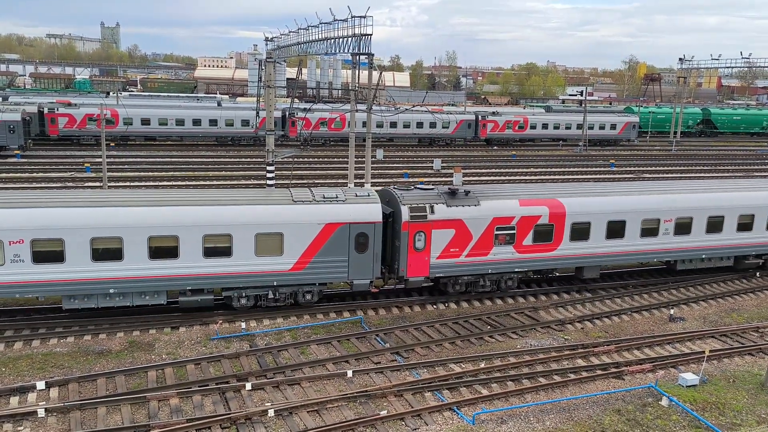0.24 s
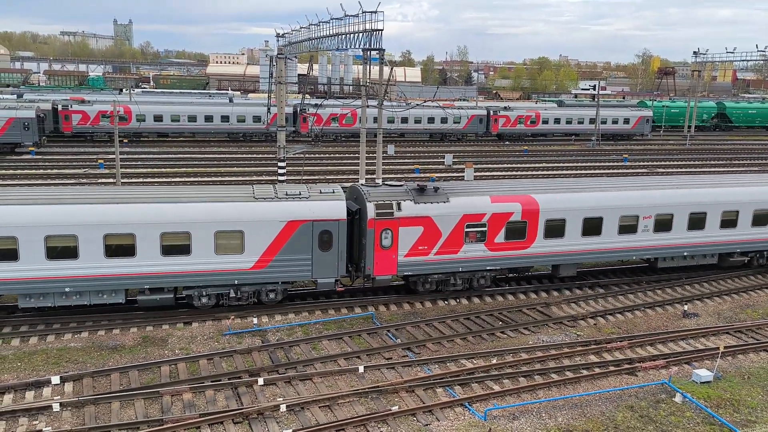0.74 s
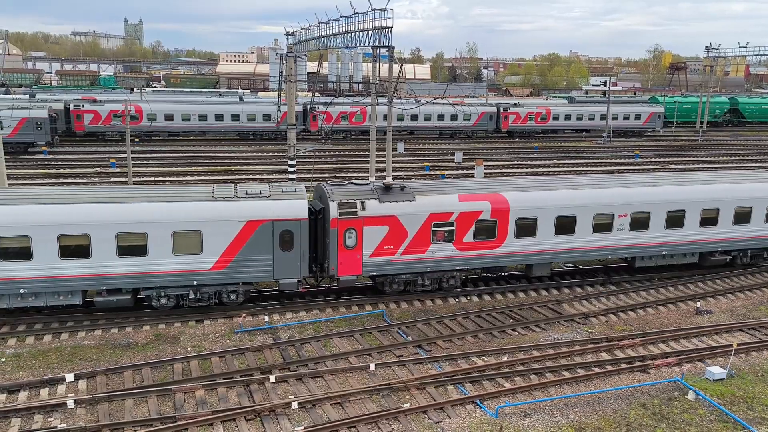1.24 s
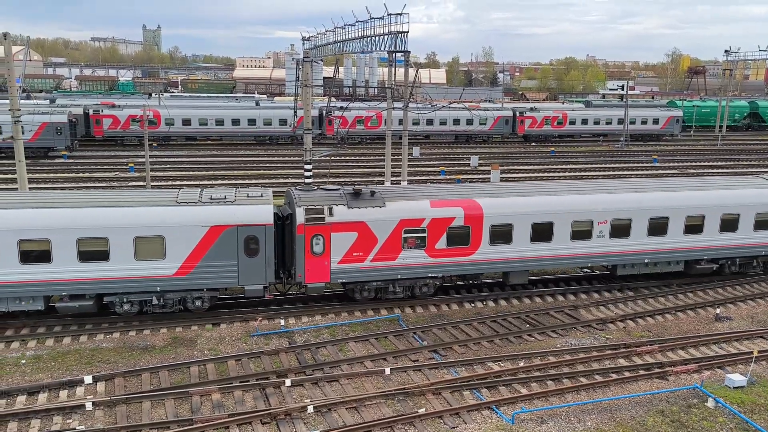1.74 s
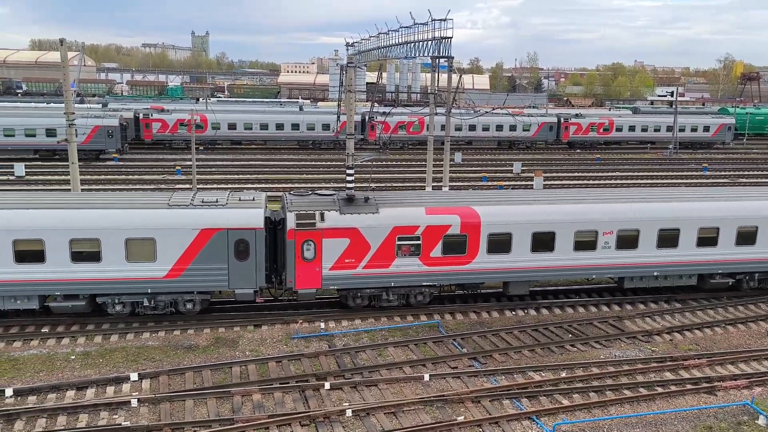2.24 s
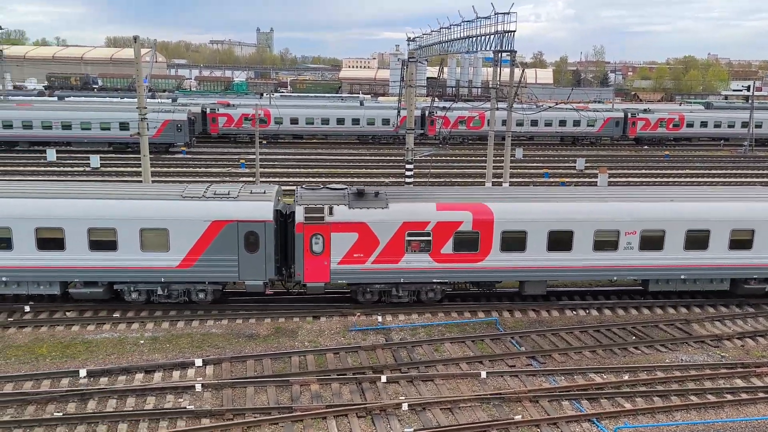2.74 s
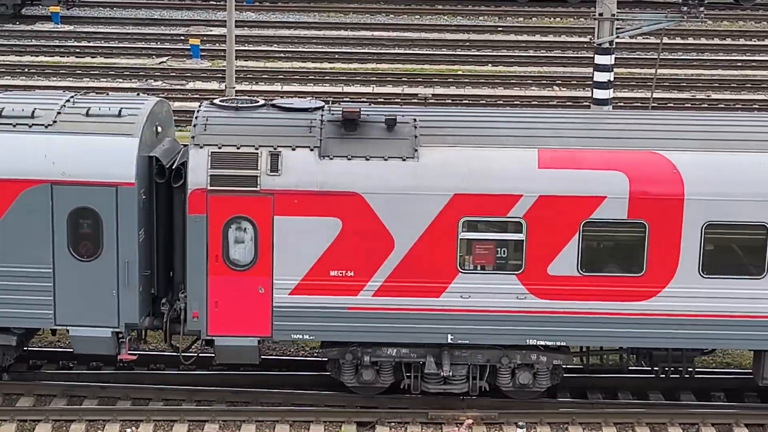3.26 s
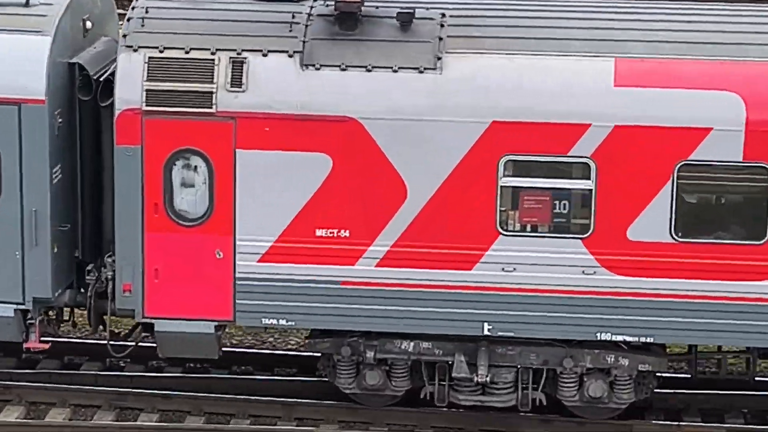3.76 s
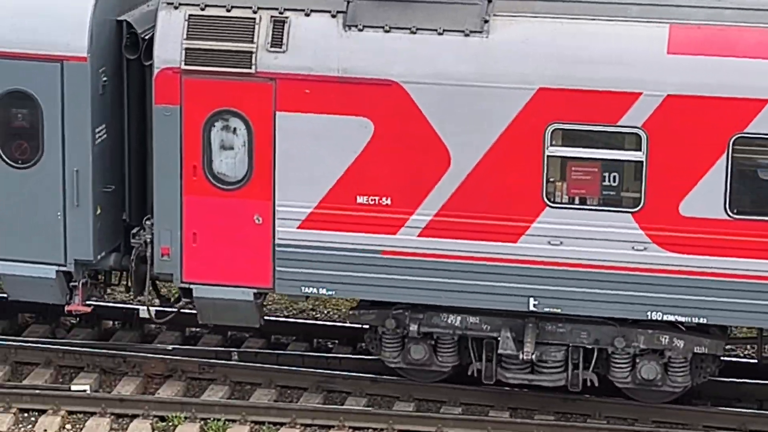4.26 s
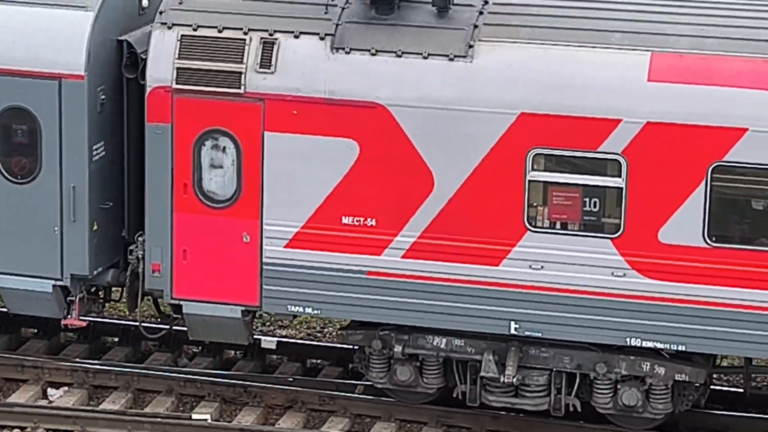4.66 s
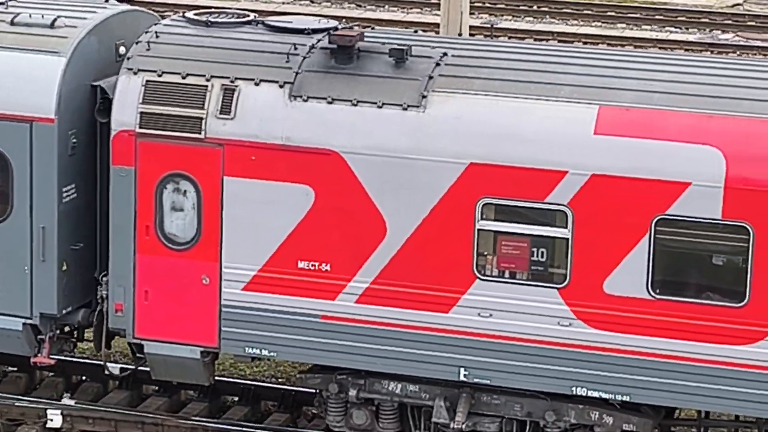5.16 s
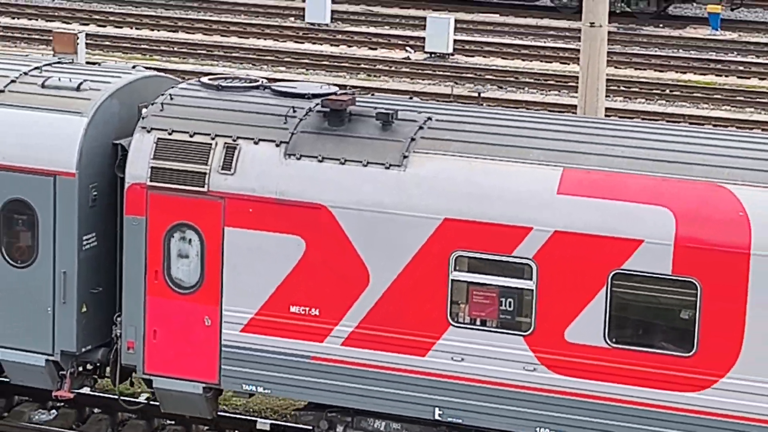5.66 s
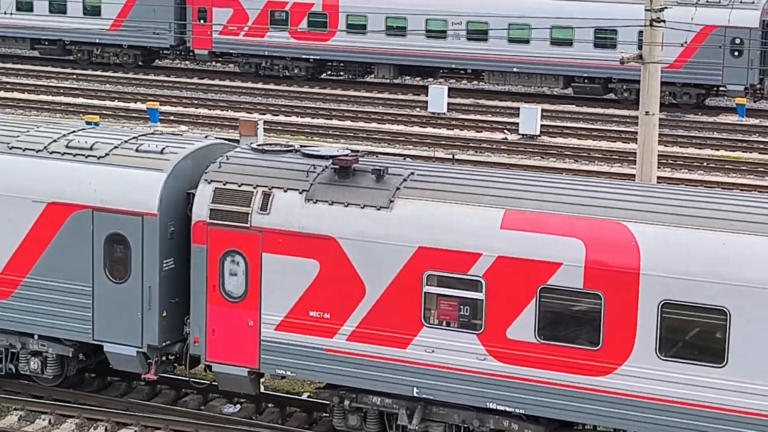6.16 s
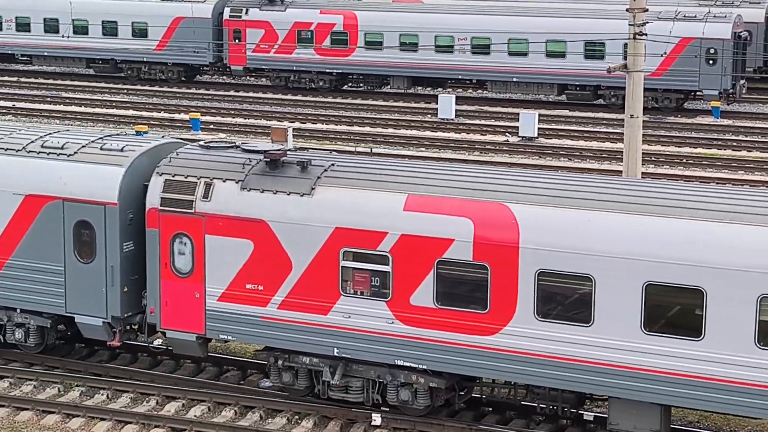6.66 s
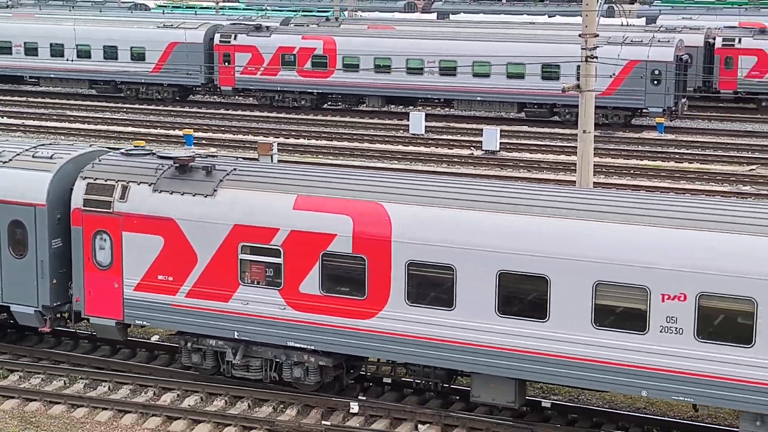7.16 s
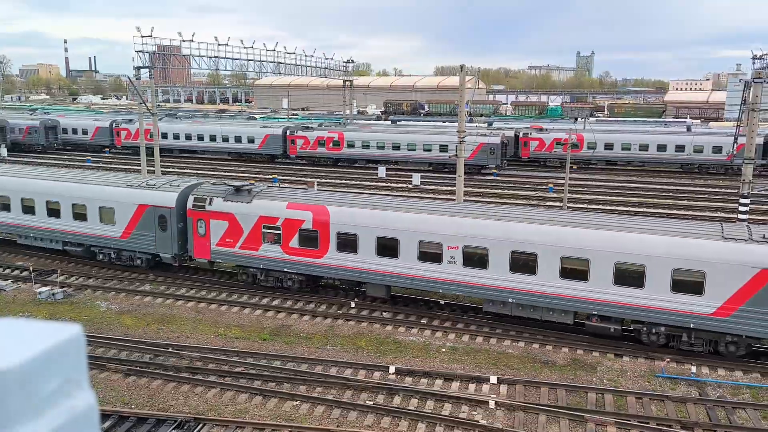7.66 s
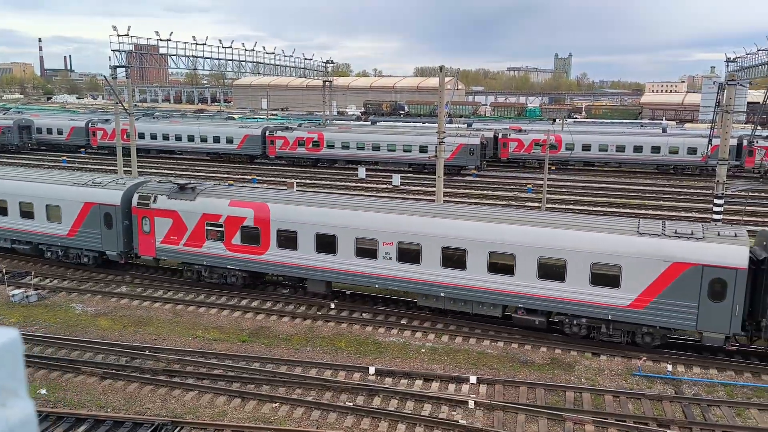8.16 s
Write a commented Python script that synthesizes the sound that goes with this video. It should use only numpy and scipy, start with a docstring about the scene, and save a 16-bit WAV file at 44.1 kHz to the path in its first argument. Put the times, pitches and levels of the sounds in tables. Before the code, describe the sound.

Passenger coaches roll slowly through a rail-yard curve, heard from above, with a low rumble throughout. From the start, the wheels grind in repeated bouts of high, ringing metallic hiss, with a piercing squeak near 0.4 seconds and a sharp scrape at 1.5. Wheels knock and thud irregularly over rail joints for the first three seconds. The grinding thins to a softer hiss around 2.3 seconds, then returns almost unbroken from 2.9 to 5.7, with thin squeals standing out near 3.7 and 5.3. A short, loud metallic screech hits at 6 seconds. From about 6.4, fainter ringing and grinding come from farther wheels, toward the right, while joint knocks, back since 5.7, continue to the end at about 8.4. Wind buffets the microphone all along with low gusts and occasional pops, strongest on the left between 2.5 and 4.5 seconds.

```python
"""Wheel flanges grind and squeal in bouts as passenger coaches roll slowly through a rail-yard curve.
Stick-slip friction hisses and rings the wheel modes; now and then one locks into a squeal.
Near the end a farther bogie takes over. Wheels knock over joints above a low rolling rumble.
Heard from above on a windy day: gusts buffet the two microphone ports in turn."""
import sys
import numpy as np
from scipy import signal
from scipy.fft import rfft, irfft, next_fast_len
from scipy.io import wavfile
from scipy.ndimage import uniform_filter1d, map_coordinates

SR = 44100
rng = np.random.default_rng(int(sys.argv[2]) if len(sys.argv) > 2 else 0)


def waveform_to_disk(signal):
    """Save audio, clipped to [-1, 1], as 16-bit WAV at the path in sys.argv[1]."""
    frames = np.transpose(np.atleast_2d(signal))
    scaled = np.clip(frames, -1, 1) * 32767
    samples = np.round(scaled).astype(np.int16)
    wavfile.write(sys.argv[1], SR, samples)


N = 370881
T = np.arange(N) / SR
HZ = np.fft.rfftfreq(N, 1 / SR)
TOP_EDGE_HZ, RASP_EDGE_HZ = (8300, 10000), (4900, 6200)  # top band fades in, low rasp band fades out

# friction hiss spectrum: (frequency [Hz], level [dB])
FRICTION_HISS = [(800, -24), (1800, -16), (2900, -9), (3800, -12), (4400, -1), (5500, 0), (6400, 4.5),
                 (7100, 3.5), (8200, 1), (8800, -13.5), (10500, -13.5), (12500, -12.5), (15000, -17),
                 (16000, -37)]


def flanges():
    """Stick-slip friction hisses at the contact and keeps the wheel modes ringing."""
    # near coach wheel modes: (frequency [Hz], width [Hz], level [dB])
    near_modes = [(3386, 24, -15), (3758, 23, -18), (4210, 32, -16), (4430, 41, -15), (5071, 28, -11),
                  (5227, 26, -10), (6013, 15, -5), (6298, 28, -6), (6939, 26, -3), (7017, 28, 0),
                  (7265, 47, -9), (7887, 17, -8), (8067, 13, -7), (8239, 21, -15), (8821, 13, -25),
                  (9103, 30, -21), (9827, 30, -19), (10193, 21, -17), (10802, 40, -21), (11526, 21, -19),
                  (11822, 47, -20), (12064, 24, -17), (12481, 17, -12), (12799, 23, -15), (13388, 17, -16),
                  (13916, 32, -20), (14462, 17, -12), (15025, 34, -19), (15754, 19, -21)]
    # farther bogie wheel modes: (frequency [Hz], width [Hz], level [dB])
    far_modes = [(5160, 37, -2), (6120, 30, 0), (6710, 34, -4), (6890, 39, -2), (7100, 29, -4),
                 (7670, 33, -7), (7890, 34, -7), (8140, 34, -11), (11400, 45, -16), (13700, 83, -16),
                 (14200, 47, -11), (14700, 44, -12), (15000, 29, -12), (15300, 120, -12)]
    handover_s = 6.33
    # countless weak modes ripple the hiss spectrum
    ripple_db = np.interp(HZ, [3000, 7000, 10000], [1.2, 2, 3.2]) * wander(70)[:len(HZ)]
    hiss = noise(amp(at_hz(FRICTION_HISS, HZ) + ripple_db), coherence=0.3)
    near = doppler(noise(wheel_gain(near_modes, sharpness=1.02), coherence=0.42))
    far = noise(wheel_gain(far_modes, sharpness=1.5), coherence=0.27)
    far_share = np.clip((T - handover_s) * 10, 0, 1)
    wheel = near * np.sqrt(1 - far_share) + far * np.sqrt(far_share)
    level_db, ring_db, top_db, rasp_db, side_db = grinding_bouts()
    chatter = amp(0.34 * wander(11) + wander(200))
    rub = (hiss * chatter + glints() + wheel * amp(ring_db)) / np.sqrt(1 + amp(ring_db) ** 2)
    grind = contact_shift(rub, top_db, rasp_db, patchy_db=2.5, flicker_db=0.9)
    grind *= amp(level_db + 0.5 * wander(17))  # unsteady flange pressure
    return (grind + bites(rub, near)) * pan(side_db)


def grinding_bouts():
    """Level, ring, top, rasp and left-right curves in dB; the strongest bout dominates the colour."""
    # flange contact: (start [s], end [s], rise [s], level [dB], ring against hiss [dB],
    # top [dB], rasp [dB], left-right [dB])
    bouts = [(-.03, 0.55, 0.053, -21.5, 3, 4, 1.5, 2), (0.546, 0.93, 0.046, -18.5, 2.5, 6.5, -1.5, 5),
             (0.91, 1.46, 0.021, -16, 0.5, 4.5, 2.5, 1.5), (1.567, 2.22, 0.021, -16.5, 2, 3, 1, 3),
             (2.226, 2.72, 0.027, -25, -18, 9, -0.5, 2.5), (2.915, 3.238, 0.029, -18, -3, 9.5, 1, -1),
             (3.244, 3.45, 0.01, -17.5, 5, 7.5, 4, 0), (3.448, 3.89, 0.052, -16.5, -3, 8, 1.5, -1.5),
             (3.89, 4.393, 0.032, -17.5, -3.5, 6, 2.5, -0.5), (4.375, 5.23, 0.04, -15.5, -4, 5, 0, -1.5),
             (5.28, 5.68, 0.02, -16, -0.5, 4, -1.5, 2), (6.417, 6.952, 0.15, -31.5, 2, 8.5, 3.5, -6.5),
             (6.96, 7.54, 0.052, -33, 2, 6, 2.5, -4), (7.79, 8.247, 0.033, -32.5, -8, 5, -4.5, -14)]
    # rubbing between bouts: (level [dB], ring against hiss [dB], top [dB], rasp [dB])
    light_rub = (-40.5, -9, 6.5, 1)
    release_s, ring_on_db_per_s = 0.089, 26
    power = np.full(N, amp(light_rub[0]) ** 2)
    rub_side_db = -30 * np.clip((T - 7.62) * 20, 0, 1)  # light rubbing moves to the right port
    colour = np.array([db * power for db in (*light_rub[1:], rub_side_db)])
    for start, end, rise, db, ring_db, *tone_db in bouts:
        bout_power = (amp(db) * swell(start, end, rise, release_s)) ** 2
        ring_on_db = ring_on_db_per_s * np.maximum(T - end, 0)  # modes outlast the hiss
        power += bout_power
        colour += np.array([value * bout_power for value in (ring_db + ring_on_db, *tone_db)])
    return 10 * np.log10(power), *(colour / power)


def wheel_gain(modes, sharpness):
    """Narrow wheel resonances, with the lowest and highest ones softer."""
    # trim on the mode levels: (frequency [Hz], gain [dB])
    mode_tilt = [(3400, -4), (3750, -5), (4200, 0), (8000, 0), (12000, -2), (15000, -6)]
    power = sum(amp(db) ** 2 / (1 + ((HZ - hz) * sharpness / width) ** 2) ** 2
                for hz, width, db in modes)
    return np.sqrt(power) * amp(at_hz(mode_tilt, HZ))


def doppler(x):
    """Pitch sinks slightly as the coach passes."""
    # Doppler shift: (time [s], pitch [ratio])
    shift = [(0, 1.0003), (1.6, .9987), (3.6, .9952), (5, .9925), (8.41, .992)]
    position = np.cumsum(curves(shift)[0])
    return np.array([map_coordinates(port, [position], order=5, mode="wrap") for port in x])


def contact_shift(x, top_db, rasp_db, patchy_db, flicker_db):
    """The contact patch moves over the flange: colour changes, modes trade strength."""
    hz, t, spectra = signal.stft(x, SR, nperseg=1024, noverlap=768)
    patches, flicker = rng.standard_normal((2, len(hz), len(t)))
    patches = unit(uniform_filter1d(uniform_filter1d(patches, 9, 0), 50, 1))
    flicker = unit(uniform_filter1d(uniform_filter1d(flicker, 30, 0), 6, 1))
    top = np.interp(hz, TOP_EDGE_HZ, [0, 1])[:, None] * np.interp(t, T, top_db)
    rasp = np.interp(hz, RASP_EDGE_HZ, [1, 0])[:, None] * np.interp(t, T, rasp_db)
    spectra *= amp(patchy_db * patches + flicker_db * flicker + top + rasp)
    return signal.istft(spectra, SR, nperseg=1024, noverlap=768)[1][:, :N]


def glints():
    """Minor modes catch briefly: faint tones at random pitches, weighted by the hiss spectrum."""
    count, low_hz, high_hz, decay_s = 400, 2967, 8530, 0.041
    out = np.zeros((2, N + SR))
    t = T[:SR // 3]
    envelope = t / decay_s * np.exp(1 - t / decay_s) * (1 - t / t[-1])
    for when, pitch, size, *phase in rng.random((count, 5)):
        hz = low_hz + pitch * (high_hz - low_hz)
        tone = np.sin(2 * np.pi * (hz * t + np.array(phase)[:, None]))
        out[:, int(when * N):][:, :len(t)] += 2 * size * amp(at_hz(FRICTION_HISS, hz)) * envelope * tone
    return amp(-11) * out[:, :N]


def bites(rub, wheel):
    """The flange catches: a friction burst, then the wheel rings and the yard echoes."""
    # flange bites and a strike at a switch: (time [s], level [dB], rise [s], decay [s], top [dB])
    catches = [(.225, -16, .004, 0.018, -5), (.26, -18, .003, 0.015, -12), (.375, -31, .005, 0.011, -11),
               (0.418, -20, 0.0025, 0.0079, -14), (1.49, -14, .003, 0.027, 5),
               (2.039, -27, .005, 0.027, -6), (2.135, -27, .005, .04, -1), (2.635, -43, .002, 0.0088, -2),
               (2.758, -22, 0.01, 0.1, 14.5), (2.86, -15.5, 0.01, 0.03, 5), (5.755, -14, 0.0025, 0.01, -6),
               (6.004, -2.5, 0.011, 0.016, -2), (6.07, -30, .005, 0.042, 8)]
    spectrum = rfft(rub)
    top = irfft(spectrum * np.interp(HZ, TOP_EDGE_HZ, [0, 1]), N)
    rasp = irfft(spectrum * np.interp(HZ, RASP_EDGE_HZ, [1, 0]), N)
    body = rub - top - rasp + amp(-8) * rasp
    burst, bright, ring = np.zeros((3, N))
    for s, db, rise, decay, top_db in catches:
        envelope = amp(db) * blow(s, rise, decay)
        burst += envelope
        bright += amp(top_db) * envelope
        ring += amp(db - 20) * blow(s, rise_s=0.01, decay_s=0.067)
    out = burst * body + bright * top + ring * wheel
    return out + amp(-12) * yard_echo(out, t60_s=0.51)


def squeals():
    """Single self-excited wheel modes swell and fade, fluttering over changing paths."""
    # locked modes: (peak time [s], rise [s], fall [s], frequency [Hz], level [dB])
    tones = [(.33, .25, .25, 7025, -24), (.385, .015, .02, 7025, -14), (.427, .006, .014, 7025, -10.5),
             (.65, .3, .2, 6011, -30), (.65, .3, .25, 7860, -32), (.3, .2, .4, 5230, -33),
             (1.85, .5, .3, 5064, -32), (1.5, .6, .6, 6295, -30), (2.26, .12, .1, 3005, -36),
             (3.66, .1, .2, 4943, -22), (3.68, .12, .15, 5052, -28), (3.7, .17, .28, 3191, -29.5),
             (4.17, .13, .22, 3186, -28.5), (4.7, .25, .3, 5975, -28), (5.25, .2, .13, 5970, -18),
             (5.66, .09, .15, 5968, -27), (5.1, .3, .35, 4395, -35), (5.1, .5, .4, 3380, -37),
             (5.6, .2, .17, 14352, -26), (1.25, .2, .25, 13380, -30), (3.3, .2, .15, 7011, -23),
             (5.65, .1, .25, 9130, -38), (5.7, .2, .3, 5028, -38), (6.04, .02, .1, 6977, -25),
             (6.75, .22, .3, 5162, -39), (7.38, .15, .12, 5160, -44), (6.95, .35, .4, 6123, -38),
             (7.58, .03, .025, 4420, -39)]
    out = np.zeros((2, N))
    flutter = amp(2 * np.array([wander(20), wander(27)]) + 3.1 * wander(45))
    path_rad = 1.1 * np.array([wander(2.2), wander(16)])
    drift = 0.000534 * wander(12.9) + 0.0018 * wander(284)  # uneven slip roughens the tone
    for s, rise, fall, hz, db in tones:
        span = slice(max(round((s - 4 * rise) * SR), 0), round((s + 4 * fall) * SR))
        t = T[span]
        envelope = amp(db) / np.cosh((t - s) / np.where(t < s, rise, fall) * 1.26)
        cycles = hz * np.cumsum(1 + drift[span]) / SR
        out[:, span] += envelope * np.sin(2 * np.pi * cycles + path_rad[:, span])
    return amp(1) * out * flutter


def joints():
    """Each wheel drop clanks on the rail end and thuds through the bogie frame."""
    # wheel drops: (time [s], level [dB], thud offset [dB])
    drops = [(0.106, -50.5, 20), (.4, -39.5, 6), (0.568, -41.5, 9), (0.649, -36.5, 11.5), (0.825, -32, 3),
             (0.989, -39, 4), (1.158, -42, 14), (1.238, -42, 10), (1.463, -34, 10.5), (1.645, -44, 12),
             (1.845, -38.5, 11), (2.658, -37, 7), (2.89, -38.5, 14), (3.595, -36, -7), (5.683, -34, 10),
             (5.895, -40.5, 2), (6.103, -39, 6.5), (6.272, -51, 26), (6.308, -45, 0), (6.348, -37, -2),
             (6.501, -40.5, 5), (6.743, -34.5, -4), (6.988, -53, 20), (7.122, -44.5, 13), (7.624, -34.5, 3),
             (7.727, -40.5, -8), (7.851, -44, 9), (8.283, -35, 4)]
    # broad clank spectrum: (frequency [Hz], level [dB])
    clank_spectrum = [(200, -42), (500, 20.5), (800, 12), (1250, 5), (1750, 9.5), (2600, 7.5), (5000, -8),
                      (12000, -39)]
    # steel resonances in the clank: (frequency [Hz], half-width [Hz], level [dB])
    steel_modes = [(990, 48, -2), (1295, 150, 4.5)]
    # bogie frame and rail modes: (frequency [Hz], level [dB], t60 [s])
    bogie_modes = [(126, 0, 0.15), (231, -6.5, 0.55), (316, 5.5, 0.18), (375.3, 7.5, 0.21),
                   (411, -19, 0.36), (577, -6, 0.11)]
    resonance = 1 + sum(amp(db) / (1 + ((HZ - hz) / width) ** 2) for hz, width, db in steel_modes)
    clank = sum(amp(db) * blow(s, rise_s=0.0037, decay_s=0.024) for s, db, _ in drops)
    clank = clank * noise(amp(at_hz(clank_spectrum, HZ)) * resonance, coherence=0.6)
    t = T[:SR // 3]
    attack = 1 - np.exp(-t / 0.0017)
    thud = np.zeros(N + len(t))
    for s, db, thud_db in drops:
        detune = 1 + 0.046 * rng.standard_normal(len(bogie_modes))
        ring = sum(amp(mode_db - 60 * t / t60) * np.sin(2 * np.pi * (hz * ratio * t + rng.random()))
                   for (hz, mode_db, t60), ratio in zip(bogie_modes, detune))
        thud[round(s * SR):][:len(t)] += amp(db + thud_db) * ring * attack
    knocks = amp(11) * clank + amp(-0.5) * thud[:N]
    return knocks + amp(-8.5) * yard_echo(knocks, t60_s=0.21)


def rolling():
    """Rough treads on rail: lumpy rumble from the whole train, roar from the nearest wheels."""
    # rumble spectrum: (frequency [Hz], level [dB])
    rumble_spectrum = [(25, -52), (50, -24), (80, 0.5), (130, -3.5), (220, -4), (400, 1), (560, -12.5),
                       (900, -27.5), (2000, -37)]
    # roar spectrum: (frequency [Hz], level [dB])
    roar_spectrum = [(250, -33), (450, 2), (700, 9), (1150, 6.5), (1650, 0), (2300, 4), (4000, -2),
                     (8000, -16), (16000, -19)]
    # course of the roar: (time [s], level [dB], left-right [dB])
    roar_course = [(0.0, -38.5, 3.5), (0.68, -39.5, 3), (1.17, -35, 0), (1.45, -41, 0.5), (2.74, -41, 0.5),
                   (3.02, -38, -3.5), (3.49, -37, 3), (3.58, -35.5, -5.5), (3.82, -37, 3),
                   (4.17, -38.5, -5), (4.22, -32, 5), (4.4, -43, -6), (5.5, -42, -4.5), (6.16, -45.5, -1),
                   (7.03, -39, 3), (7.24, -40, 3), (8.34, -42, -10), (8.41, -35, -4)]
    level_db, side_db = curves(roar_course)
    rumble = noise(amp(at_hz(rumble_spectrum, HZ)), coherence=0.91) * amp(-33 + 2.34 * wander(28))
    roar_gain = amp(level_db + 1.5 + 2.36 * wander(11.4))
    roar = noise(amp(at_hz(roar_spectrum, HZ)) * HZ / (HZ + 200), coherence=0.13)
    return rumble + roar_gain * roar * pan(side_db)


def wind():
    """Eddies buffet each port separately: gusts and pops on a lumpy breeze; fast eddies sound higher."""
    # breeze: (time [s], level [dB], left-right [dB])
    breeze = [(0, -30, -9), (1.3, -35.5, -16), (2.2, -37.5, -10), (2.7, -29, 8), (3.75, -22.5, 5),
              (4.5, -38, 14), (5.2, -35.5, 10), (5.8, -30, 0.5), (7.2, -27.5, 1), (8.1, -38.5, -13),
              (8.41, -27.5, -7)]
    # gusts: (start [s], length [s], level [dB], left-right [dB], fast-eddy share [0-1])
    gusts = [(0.295, 0.048, -23, -8, 0.36), (1.216, 0.047, -21, -8, 0.1), (1.845, 0.032, -21.5, -2, 1),
             (2.43, 0.14, -25, 14, 0.2), (2.596, 0.074, -19.5, 18, 0.3), (2.763, 0.044, -13.5, 22, 0),
             (2.875, 0.042, -15.5, 20, .4), (3.086, 0.042, -19, 16, 0.8), (3.271, 0.28, -17.5, 18, 1),
             (3.904, 0.2, -18.5, 30, 0.68), (4.159, 0.24, -16.5, 20, 0.85), (4.653, 0.24, -24, 14, 0.04),
             (4.997, 0.1, -21.5, 12, 0.3), (5.335, 0.13, -22, -10, 0.11), (5.704, 0.086, -24, -9, 0.02),
             (5.82, 0.23, -25.5, -22, 0), (6.23, 0.13, -27, 13, 0.1), (6.597, 0.11, -26, -18, 0),
             (6.87, 0.26, -24, 9, 0), (7.27, 0.13, -30, -14, 0), (7.558, 0.052, -22, -10, 0.07),
             (7.673, 0.075, -34, -10, .05)]
    # deep pops: (time [s], level [dB], frequency [Hz], half-length [s], left-right [dB])
    pops = [(0.471, -13, 116, 0.0084, -29), (2.92, -18, 92, 0.0071, 30), (6.035, -9.5, 96.5, 0.0081, -20),
            (7.62, -22, 133, 0.011, -17)]
    # buffeting spectrum: (frequency [Hz], level [dB])
    spectrum = [(25, -80), (50, -48), (80, -1.5), (130, 3.5), (260, 1), (400, -9), (600, -24.5),
                (1000, -37.5), (2000, -47), (5000, -54)]
    level_db, side_db = curves(breeze)
    lumps_db = 2.5 * np.array([wander(20.6), wander(20.6)])
    power = (amp(level_db + lumps_db) * pan(side_db)) ** 2
    fast_power = 0.11 * power
    for s, length, db, side, share in gusts:
        gust_power = (amp(db) * pan(side) * swell(s, s + length, rise_s=0.013, fall_s=0.022)) ** 2
        power += gust_power
        fast_power += share * gust_power
    eddies = amp(2.57 * np.array([wander(28), wander(31)]))
    slow = noise(amp(at_hz(spectrum, HZ)), coherence=0)
    fast = noise(amp(at_hz(spectrum, HZ / 1.51)) * HZ ** 2 / (HZ ** 2 + 220 ** 2), coherence=0)
    out = eddies * (np.sqrt(abs(power - fast_power)) * slow + np.sqrt(fast_power) * fast)
    for s, db, hz, half_s, side in pops:
        out += amp(db) * pan(side) * np.sin(2 * np.pi * hz * (T - s)) * np.exp(-((T - s) / half_s) ** 2)
    return out


def yard_echo(x, t60_s):
    """Scattered echoes from coaches and track."""
    t = T[:SR]
    taps = rng.standard_normal((2, SR)) * (rng.random((2, SR)) < 0.05)
    taps *= amp(-60 * t / t60_s) * (t > 0.012)
    return signal.fftconvolve(x, taps / np.linalg.norm(taps[0]), axes=1)[:, :N]


def amp(db):
    """Decibels to gain."""
    return 10 ** (np.asarray(db) / 20)


def unit(x):
    """Scale to rms 1."""
    return x / np.sqrt(np.mean(x ** 2) + 1e-20)


def at_hz(spectrum, hz):
    """Interpolate a spectrum over log frequency."""
    points_hz, db = np.transpose(spectrum)
    return np.interp(np.log(hz + 1), np.log(points_hz), db)


def curves(rows):
    """Columns of a timed table, per sample."""
    s, *columns = np.transpose(rows)
    return [np.interp(T, s, column) for column in columns]


def pan(db):
    """Constant-power gains; positive is left."""
    return np.sqrt(2 / (1 + amp(np.array([-db, db]).reshape(2, -1)) ** 2))


def wander(rate_hz):
    """Smooth random motion of rms 1, up to about rate_hz."""
    size = next_fast_len(N, real=True)
    hz = np.fft.rfftfreq(size, 1 / SR)
    return unit(irfft(rfft(rng.standard_normal(size)) / (1 + (hz / rate_hz) ** 4), size)[:N])


def noise(gain, coherence):
    """Coloured noise at both ports; the shared part reaches the left first."""
    lag_s = 0.00027
    left, separate = rfft(rng.standard_normal((2, N)))
    delayed = left * np.exp(-2j * np.pi * HZ * lag_s)
    right = coherence * delayed + np.sqrt(1 - coherence ** 2) * separate
    return unit(irfft(np.array([left, right]) * gain, N))


def blow(start_s, rise_s, decay_s):
    """Impact envelope: quick rise, exponential fall."""
    envelope = np.zeros(N)
    part = envelope[round(start_s * SR):][:SR // 2]
    age = T[:len(part)]
    part += (1 - np.exp(-age / rise_s)) * np.exp(-age / decay_s)
    return envelope


def swell(start_s, end_s, rise_s, fall_s):
    """Envelope: rise, hold until end_s, die away."""
    attack = 1 - np.exp(-np.maximum(T - start_s, 0) / rise_s)
    return attack * np.exp(-np.maximum(T - end_s, 0) / fall_s)


def scene():
    """Grinding and squeals coloured by the two ports, plus joints, rolling and wind."""
    # treble balance of the ports: (frequency [Hz], left-right [dB])
    port_balance = [(1500, 0), (3000, -3.5), (5000, 4.5), (6500, 0.5), (7050, -11.5), (7500, 10), (8100, 3),
                    (9100, 21), (10000, 6), (11500, 15), (13000, 4), (15500, 11)]
    wheels = irfft(rfft(flanges() + squeals()) * pan(at_hz(port_balance, HZ)), N)
    return wheels + joints() + rolling() + wind()


def record(dry):
    """Loud bass at a port ducks its treble; soft overload on peaks, then the band limit."""
    split_hz, threshold_db, window_s = 1900, -15.5, 0.017
    ceiling, cutoff_hz = 0.85, 15900
    bass = irfft(rfft(dry) / (1 + (HZ / split_hz) ** 4), N)
    rate = 2 / (window_s * SR)
    bass_power = signal.filtfilt([1], [1, -np.exp(-rate)], bass ** 2) * rate ** 2
    ducked = bass + (dry - bass) / np.hypot(1, bass_power / amp(threshold_db) ** 2)
    limited = ducked / (1 + (ducked / ceiling) ** 6) ** (1 / 6)
    lowpass = signal.firwin(511, cutoff_hz, window=("kaiser", 9), fs=SR)
    return signal.oaconvolve(limited, lowpass[None], "same")


dry = scene()
out = record(dry)
waveform_to_disk(out)
```